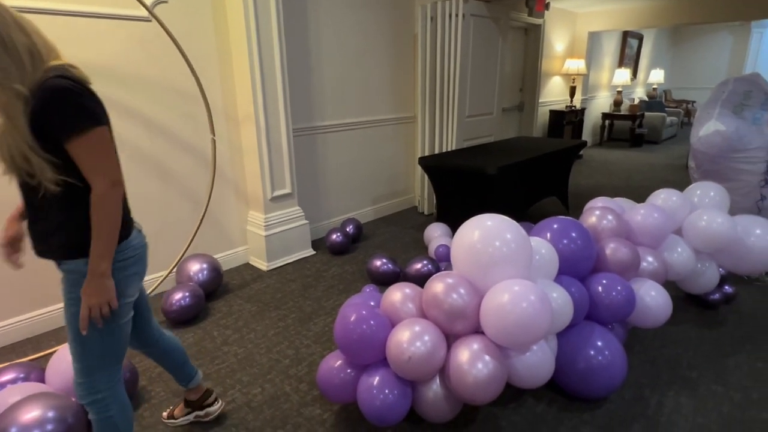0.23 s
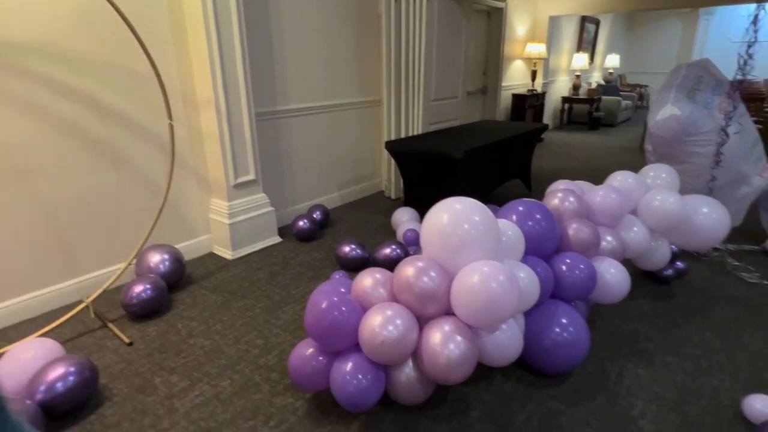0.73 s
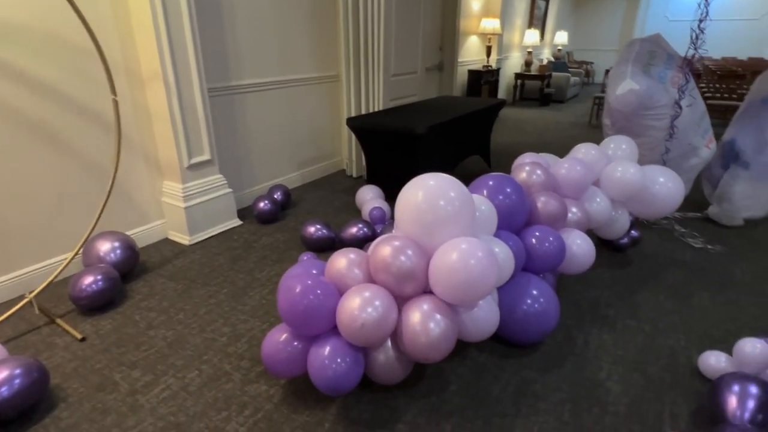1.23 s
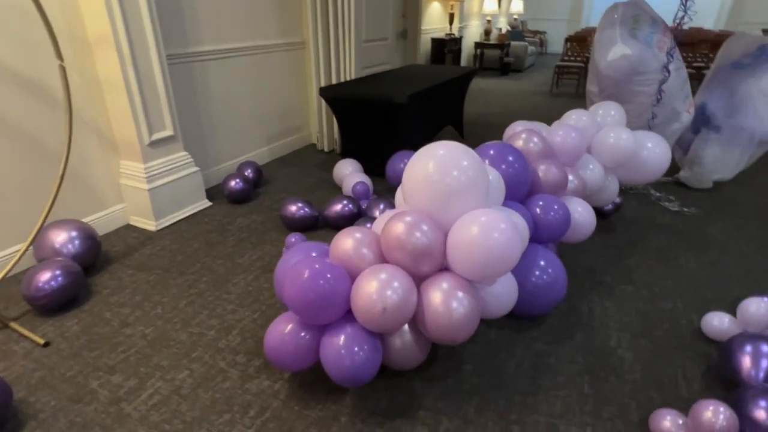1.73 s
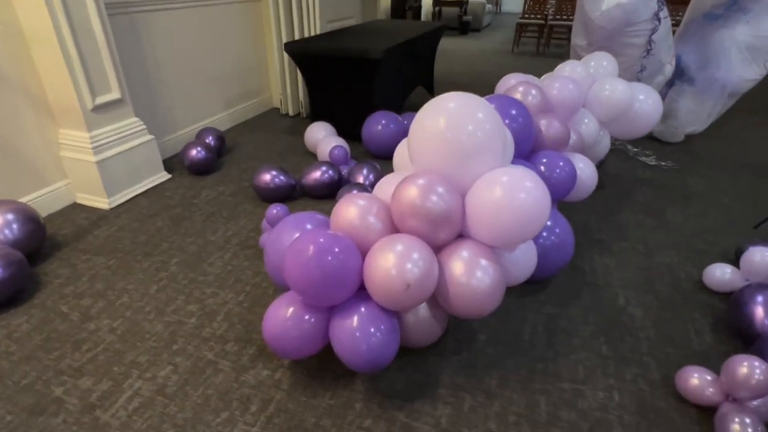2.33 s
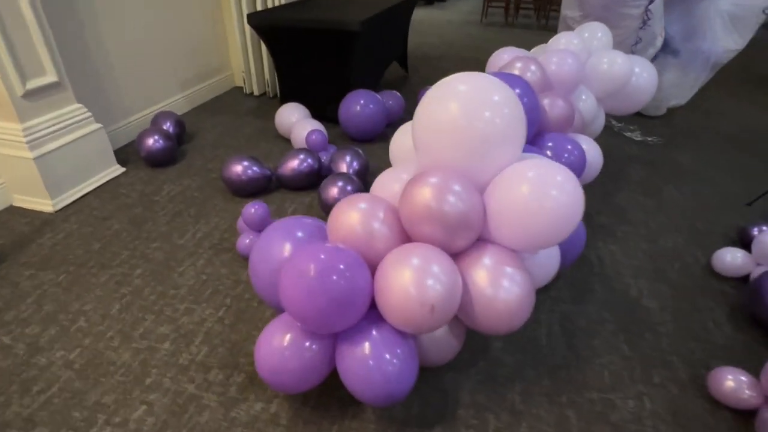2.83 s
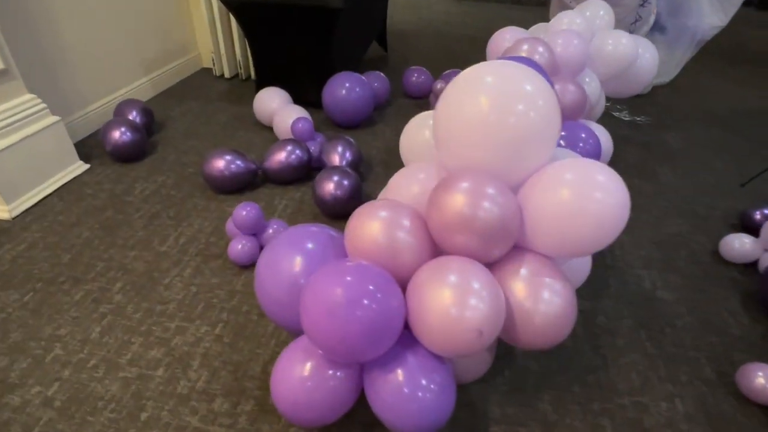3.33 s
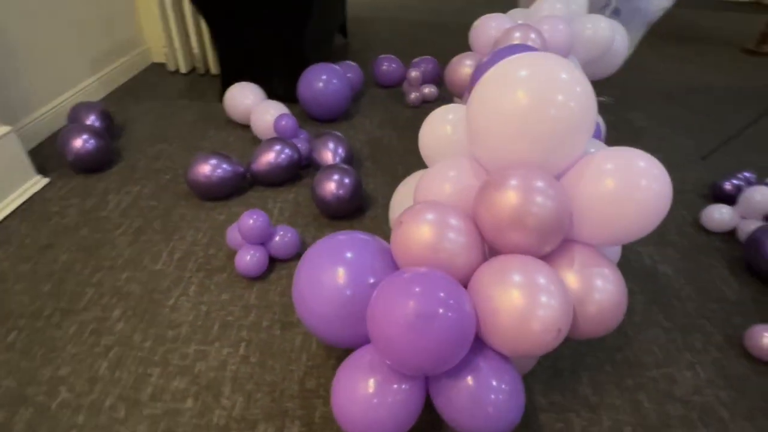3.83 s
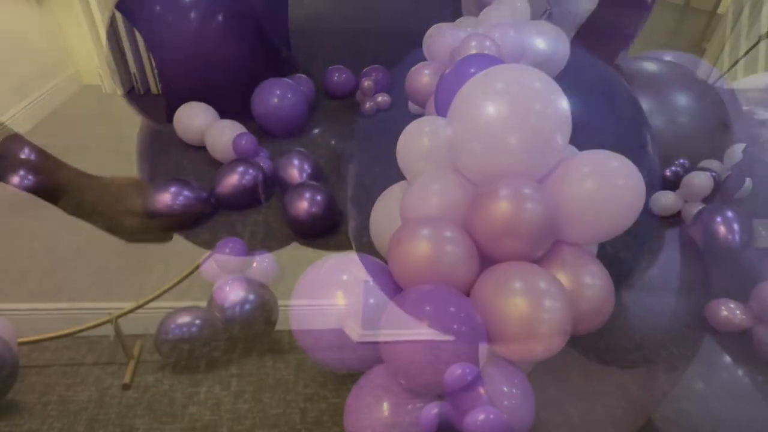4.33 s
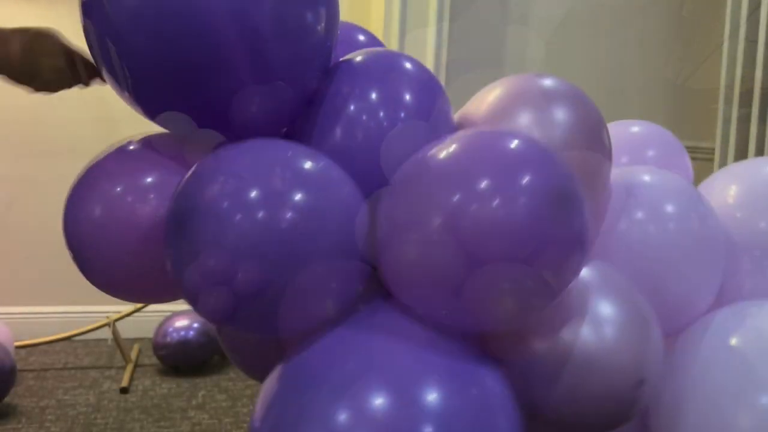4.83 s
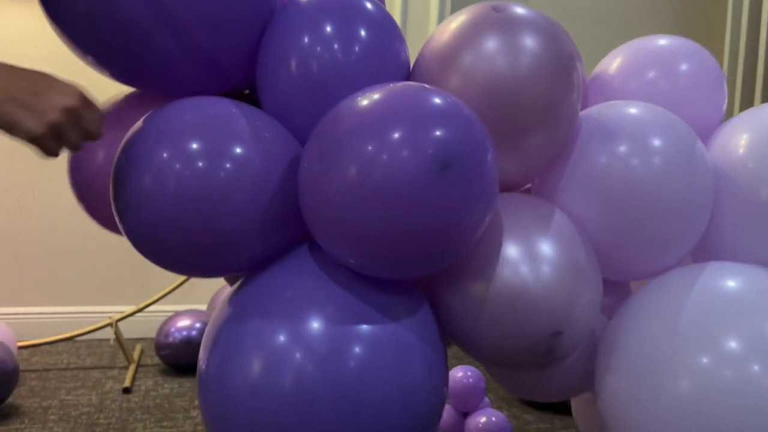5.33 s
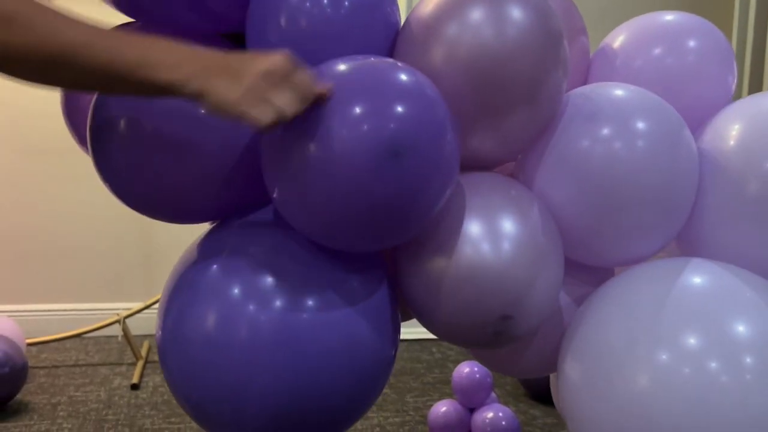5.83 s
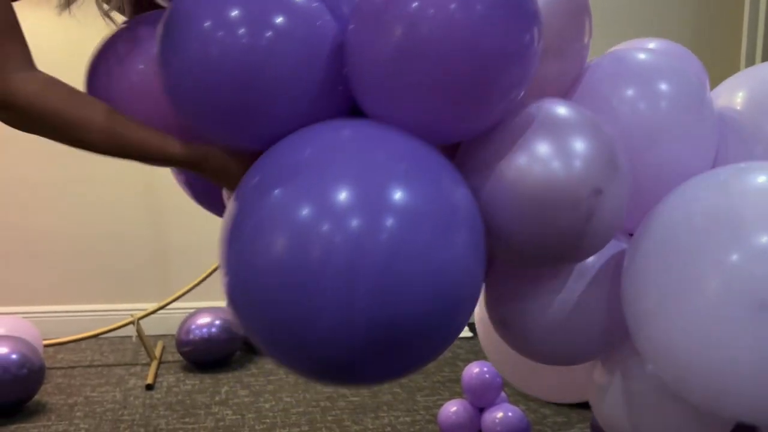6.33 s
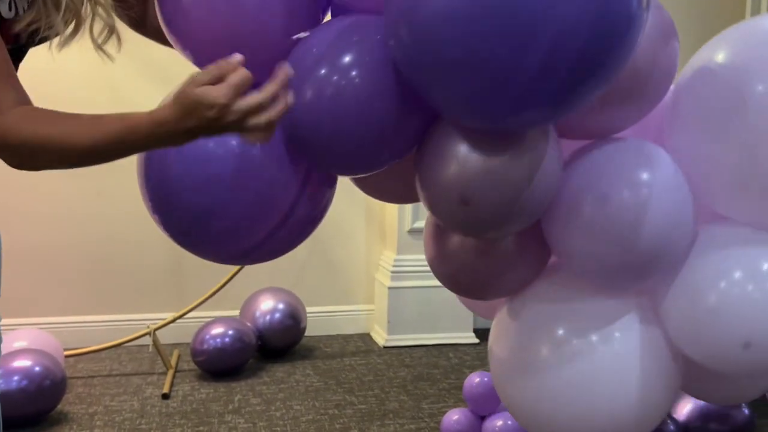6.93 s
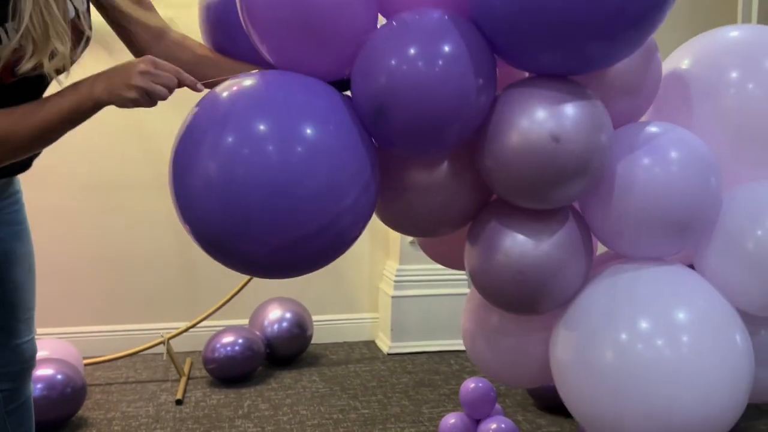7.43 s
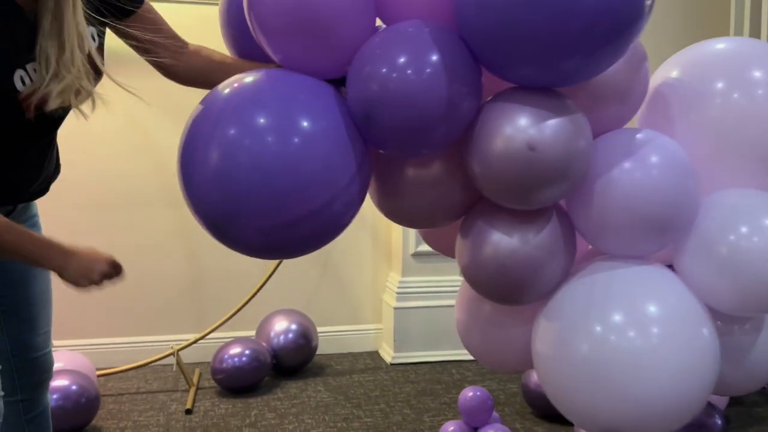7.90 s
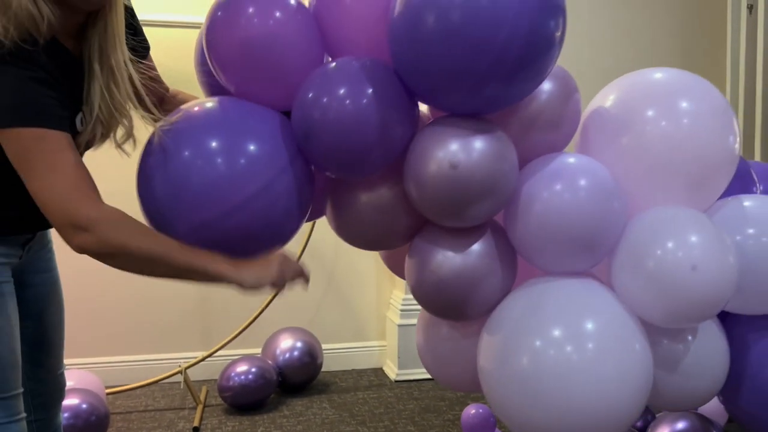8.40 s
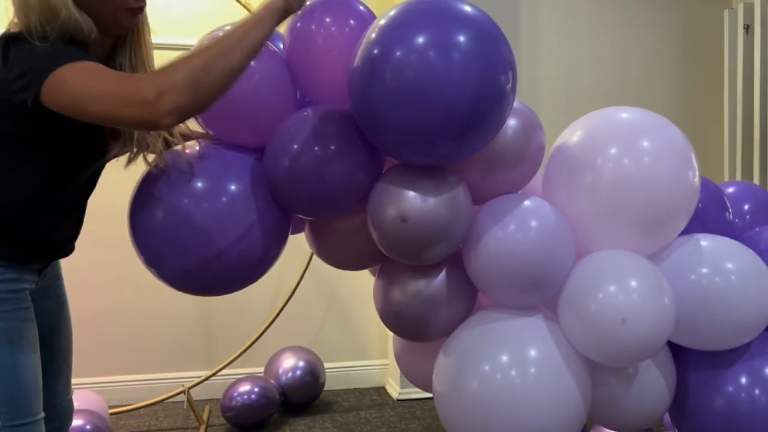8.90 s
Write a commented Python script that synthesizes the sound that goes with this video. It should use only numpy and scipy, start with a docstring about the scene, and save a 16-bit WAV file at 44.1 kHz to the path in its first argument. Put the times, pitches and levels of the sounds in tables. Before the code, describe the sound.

A carpeted indoor hall with a low, slowly throbbing ventilation hum. At first only faint shoe scuffs, cloth brushing and a few tiny clicks. After about four seconds latex balloons start rubbing close by, with gritty friction, hollow falling knocks, short squeaks and snappy cracks, strongest near five and seven and a half seconds, then softer creaks. Stereo microphone fairly near, brief room ring, work slightly left.

```python
"""Balloon garland in a humming hall

A garland of latex balloons is fitted together in a carpeted hall where the ventilation hums.
Mostly shoes and clothes brush along first, as shaped noise; then the balloons rub in streams of tiny slips.
Stuck skins let go with a noisy crack and a hollow, falling knock; swept tones squeak or groan,
and short noise bursts make clicks, taps and bright edges. Decaying noise makes the hall ring briefly.
"""
import sys
import numpy as np
from scipy import signal
from scipy.fft import rfft, irfft
from scipy.io import wavfile
from scipy.ndimage import map_coordinates

SR = 44100
rng = np.random.default_rng(int(sys.argv[2]) if len(sys.argv) > 2 else 0)


def unload_wav(signal):
    """Save mono or channel-first audio to the path in sys.argv[1] as 16-bit WAV at rate SR, clipped to [-1, 1]."""
    wavfile.write(
        sys.argv[1],
        SR,
        np.round(np.clip(np.atleast_2d(signal).T, -1, 1) * 32767).astype(np.int16),
    )


N = 403956
T = np.arange(N) / SR  # time of every sample [s]
SIDES = np.array([[1], [-1]])  # left, right

# Levels in the tables are those going into the mix; the layers are balanced further on.
# skins letting go: (time [s], knock [dB], knock pitch at its peak [Hz], heave [dB], rasp [dB],
# crack [dB], slip length [s])
SLIPS = [ (4.485, -40, 650, -53, -52, -65, 0.0021), (4.631, -32, 570, -51, -45.5, -71, 0.019),
         (4.683, -44, 700, -50, -45, -51.5, 0.023), (4.75, -13.5, 350, -29, -26, -24.5, 0.0095),
         (4.844, -30, 400, -46, -63, -38.5, 0.0063), (4.966, -31, 504, -45, -42, -61, 0.0029),
         (5.04, -35, 600, -52, -54, -66, .012), (5.211, -32, 620, -38, -38, -44, 0.0045),
         (5.2130, -16, 520, -19.5, -47, -54, .002), (5.357, -8.5, 456, -18.5, -19.5, -29.5, 0.0062),
         (5.373, -25, 500, -28, -32, -50, 0.0045), (5.57, -27.5, 470, -31, -40, -44, 0.005),
         (5.616, -24, 490, -32, -33, -34, 0.0072), (5.837, -22.5, 606, -31, -38, -42, 0.0041),
         (5.901, -27, 427, -36, -56, -49, 0.0046), (6.127, -41, 603, -48, -54, -70, 0.0017),
         (6.161, -36, 520, -43, -54, -66, 0.0025), (6.225, -28.5, 440, -35.5, -41, -44.5, 0.0098),
         (6.284, -29, 470, -34, -55, -60, 0.0028), (6.403, -37, 645, -46, -42, -53, .005),
         (6.687, -34, 570, -30, -56, -47, 0.0022), (6.806, -44, 710, -49, -45, -52, 0.0035),
         (6.924, -42, 500, -53, -53, -70, 0.0025), (6.948, -36, 554, -53, -49, -66, 0.0033),
         (7.055, -40, 605, -55, -44, -64, .003), (7.0963, -30, 457, -33.5, -37, -52, 0.0057),
         (7.171, -33, 380, -52, -45.5, -59, 0.022), (7.321, -52, 400, -60, -50, -35, 0.0015),
         (7.4490, -19, 340, -34, -33, -34, 0.011), (7.455, -23.5, 330, -31, -30, -32, 0.0077),
         (7.6117, -35, 300, -44, -30, -10.5, 0.0011), (7.6142, -16.5, 285, -23, -21, -21, 0.0045),
         (7.6683, -17.5, 640, -41, -35, -18, 0.0033), (7.673, -21, 470, -26, -24.5, -38, 0.0046),
         (7.85, -30, 580, -50.5, -31.5, -34.5, 0.0068), (8.11, -60, 395, -58, -43.5, -55.5, 0.0059),
         (8.277, -41, 372, -48, -35, -65, 0.0039), (8.3034, -26.5, 320, -31, -36, -45.5, 0.018),
         (8.578, -43, 380, -54, -62, -42, 0.0054), (8.642, -42, 346, -50, -42, -50.5, 0.011),
         (8.705, -52, 370, -62, -59, -40, 0.0091), (8.774, -41, 455, -46, -41.5, -58, 0.0082),
         (8.965, -40, 580, -55, -55, -56, 0.0028), ]
# faint slips lie deep in the garland and reach the ear mostly by way of the hall:
# room level of a typical slip, and room gained per dB that a slip is fainter
SLIP_ROOM_DB, ROOM_SLOPE, TYPICAL_SLIP_DB = 2, 0.29, -23.5
# a short slip stirs the hall less than a long drag: dB per doubling of the slip length
ROOM_DB_PER_DOUBLING, TYPICAL_SLIP_S = 2, 0.0047
# where the hands work: (time [s], left minus right [dB])
HAND_BALANCE = [(4.7, 3), (5.35, 5.5), (6.5, 1.5), (7.6, 1), (7.7, -1), (9, -1)]
# the air inside the balloons: (frequency [Hz], time to fall 60 dB [s], level [dB])
CAVITY_MODES = [(242, 0.52, -27), (336, 0.038, 7.5), (411, 0.041, 8.5), (550, 0.58, -10), (620, 0.33, 1),
                (737, 0.02, 15), (840, .2, -46), (1060, 0.28, -6), (1480, 0.048, 0), (2380, 0.12, 9)]

# how hard the balloons are pressed and dragged on each other: (time [s], effort [dB])
EFFORT = [(3.7, -47), (4.15, -11.5), (4.3, -8.5), (4.52, -0.5), (4.66, 6), (4.73, 0), (4.8, -1),
          (5.15, 0.5), (5.45, 3.5), (5.7, 0.5), (5.8, 5.5), (6.02, -4), (6.27, 2.5), (6.5, 1.5),
          (6.62, 3.5), (7.0, -5.5), (7.3, 1.5), (7.6, 11), (7.92, -4.5), (8.3, 2), (8.72, 3.5), (9.0, -8)]
# each layer of the rubbing: level at an effort of 0 dB, and dB gained per dB of effort
# (hard rubbing is brighter)
BODY_DB, BODY_SLOPE = -41.5, 0.69
RASP_DB, RASP_SLOPE = -48, 1.26
HISS_DB, HISS_SLOPE = -59, 1.18
# drumming of the balloons: (frequency [Hz], level per hertz [dB])
BODY_SPECTRUM = [(60, -19.5), (130, -19), (220, 1), (330, -2), (550, -4), (800, -6.5), (1300, -14.5),
                 (3000, -61)]
# rasp of the skins: (frequency [Hz], level per hertz [dB])
RASP_SPECTRUM = [(300, -19), (700, 1), (1000, 2.5), (1500, -2), (2300, -4.5), (3500, -12), (6000, -17.5),
                 (12000, -82)]
# hiss of fine slips, also the crack: (frequency [Hz], level per hertz [dB])
HISS_SPECTRUM = [(1200, -5.5), (3000, 0.5), (5000, -0.5), (6800, 4), (8600, 4.5), (10500, -8.5),
                 (12500, 2.5), (16000, -12)]

# single catches that stand out of the rubbing; the level is for the lowest pitch at an effort of 0 dB
CATCHES_PER_S, CATCH_DB, CATCH_LOW_HZ, CATCH_HIGH_HZ = 40, -38, 450, 2800

# skins chattering: (time [s], length [s], start pitch [Hz], end pitch [Hz], level [dB],
# pitch roughness [0-1])
SQUEAKS = [ (0.245, 0.11, 1300, 1536, -60, .1), (.938, .045, 1130, 1220, -55, .1),
           (1.014, .055, 1230, 1260, -58, .05), (4.618, 0.1, 564.4, 614, -41, 0.17),
           (4.622, 0.06, 1020, 1140, -44, 0.12), (4.63, .05, 2480, 2440, -51, .025),
           (4.685, 0.037, 1380, 1460, -46, 0.01), (4.686, .055, 2200, 2050, -49, .06),
           (5.387, 0.049, 915, 900, -36.5, 0.03), (7.404, 0.029, 327, 315, -31, 0.07),
           (7.468, 0.07, 1090, 1110, -44, 0.03), (7.545, 0.075, 1040, 1000, -40.5, 0.025),
           (7.694, 0.035, 350, 292, -27.5, 0.07), (7.851, .035, 1060, 1020, -37.5, .03),
           (7.864, 0.015, 332, 306, -27, 0.06), (8.106, .06, 2400, 2260, -51, .024),
           (8.106, .09, 2700, 2860, -52, .03), (8.107, .06, 3380, 3260, -53, .028),
           (8.122, .05, 1115, 1150, -56, 0), (8.316, 0.06, 325, 280, -30.5, 0.16),
           (8.415, 0.105, 335, 265, -29.5, 0.2), (8.635, 0.07, 330, 245, -34, 0.22),
           (8.76, 0.057, 1300, 1590, -45, 0.4), ]

# dry, very bright noise bursts, several together with a slip: (time [s], level [dB], length [s])
BRIGHT_BURSTS = [(4.846, -25.5, 0.0069), (6.234, -34.5, 0.0064), (7.004, -40, .0015), (7.319, -44, .001),
                 (7.611, -21, .0008), (7.6695, -19, 0.0024)]
# a bright burst: (frequency [Hz], level per hertz [dB])
BURST_SPECTRUM = [(2000, -30), (5000, -6), (8000, 3), (12000, 2), (16000, 3)]

# brief clicks and taps, some of them at the sharp edge of a slip:
# (time [s], bright tick [dB], thin click [dB], dull tap [dB], ring pitch [Hz], ring [dB])
TICKS = [ (.1950, -39, -43, -43, 1400, -44), (0.2153, -45, -63, -57, 1400, -48),
         (.2380, -36, -40, -46, 1050, -43), (.2875, -25, -42, -37, 1780, -31.5),
         (.333, -65, -60, -57, 1550, -46), (0.9305, -52, -39, -42, 2200, -50),
         (1.396, -70, -41, -56, 1500, -44), (1.458, -62, -52, -45, 1000, -50),
         (1.712, -80, -60, -46, 800, -38), (1.962, -73, -60, -54, 1050, -38),
         (3.63, -80, -60, -54, 1690, -41), (4.215, -80, -66, -50, 690, -39),
         (4.405, -62, -44, -44, 1500, -60), (5.2105, -60, -36, -50, 1500, -60),
         (5.8375, -60, -28, -34, 1300, -34), (7.098, -60, -35, -42, 1500, -60),
         (7.3212, -50, -33, -38, 1100, -36), (7.6120, -24, -11, -24, 1400, -24), ]
# a bright tick: (frequency [Hz], level per hertz [dB])
TICK_SPECTRUM = [(1000, -40), (6500, -47), (8500, 8), (9600, 9), (11000, 2), (13000, -31), (16000, -59)]
# a thin click: (frequency [Hz], level per hertz [dB])
CLICK_SPECTRUM = [(500, -22), (1400, 0), (3000, -1), (5800, -1), (8000, -12), (14000, -40)]
# a dull tap: (frequency [Hz], level per hertz [dB])
TAP_SPECTRUM = [(300, -2), (700, 15), (1350, 0), (1850, -12), (2400, -16), (5000, -43), (8000, -16),
                (14000, -40)]

# footfalls, each a touch and a drag over the pile: (time [s], fade time [s], touch [dB], scuff [dB], swish [dB])
STEPS = [ (.172, 0.18, -59, -50.5, -62), (0.462, 0.037, -66, -55, -56), (.890, 0.065, -68, -51, -63),
         (.930, 0.1, -62, -61, -89), (1.456, 0.067, -53, -50, -67), (1.592, 0.022, -43, -65, -64),
         (1.713, 0.033, -53, -60, -72), (1.96, 0.11, -58, -50.5, -83), (2.405, 0.51, -46, -56.5, -60),
         (2.671, 0.059, -65, -69, -90), (3.632, 0.01, -69, -78, -86), (4.215, 0.013, -63, -70, -82),
         (4.256, 0.04, -54, -50, -85), ]
# cloth sliding on cloth, each a swell and a fade:
# (peak time [s], rise time [s], fade time [s], scuff [dB], swish [dB])
BRUSHES = [ (.3, .07, 0.056, -75, -83), (.96, 0.17, 0.17, -57, -65.5), (1.58, 0.21, 0.22, -57.5, -68.5),
           (2.09, 0.17, 0.17, -56.5, -63), (2.68, 0.24, 0.78, -62, -60.5), (2.76, 0.13, 0.05, -52.5, -70),
           (2.91, 0.13, 0.2, -52.5, -57.5), (3.68, 0.28, 0.27, -55.5, -79), ]
# dull scuffing: (frequency [Hz], level per hertz [dB])
SCUFF_SPECTRUM = [(150, -19.5), (300, 7.5), (600, -2.5), (1100, -3), (2200, -11.5), (4000, -17),
                  (8000, -29.5), (13000, -56)]
# bright swishing: (frequency [Hz], level per hertz [dB])
SWISH_SPECTRUM = [(1500, -20), (4000, -2.5), (7500, 5.5), (9500, 2), (12000, -8), (16000, -18)]

# the tail of the hall: (frequency [Hz], time to fall 60 dB [s])
HALL_DECAY = [(100, 0.6), (400, 0.88), (2000, 0.61), (6000, 0.63), (14000, 0.21)]
# likeness of left and right in sound from all sides: (frequency [Hz], likeness [0-1])
LIKENESS = [(50, 1), (250, 0.89), (500, 0.58), (1000, 0.1), (3000, 0.019), (8000, 0.044)]
LEFT_DB, RIGHT_LAG_S = 1.57, 1 / SR  # the work lies a little to the left

# two fans: the second runs a little slower and sags further, so their beat quickens up to a limit
FAN_HZ, BEAT_START_HZ, SAG_HZ_PER_S, BEAT_END_HZ = 59.0, 2.24, 0.99, 4.7
BLADE_HZ = 191.3
# each hum tone along the way through the standing waves of the hall; first fan: (time [s], level [dB])
FAN_LEVEL = [(0, -40), (1.25, -37), (2, -43), (3, -58), (3.9, -55), (4.55, -43), (5.7, -51), (6.7, -38.5),
             (7.55, -35.5), (9.15, -44)]
# second, slower fan: (time [s], level [dB])
SLOW_FAN_LEVEL = [(0, -42), (1.3, -38.5), (3.5, -46), (4.2, -56), (5.5, -48), (9.15, -55)]
# overtone of the first fan: (time [s], level [dB])
OVERTONE_LEVEL = [(0, -48), (1.4, -51), (2.6, -48), (7.3, -45.5), (9.15, -46)]
# blade tone: (time [s], level [dB])
BLADE_LEVEL = [(0, -47.5), (1.4, -46), (1.8, -40.5), (2.8, -42), (3.4, -45), (4.2, -45.5), (4.55, -60),
               (5.2, -49), (9.15, -48)]
# air in the ducts: (frequency [Hz], level per hertz [dB])
AIR_SPECTRUM = [(20, -22), (35, -17), (48, 4), (90, 0.5), (150, -5.5), (230, -10), (400, -22.5),
                (700, -27.5), (1200, -32.5), (2500, -44.5), (5000, -50), (9000, -52.5), (13000, -72)]
AIR_DB = -41

TOP_HZ = 16000  # upper edge of the whole sound


def undb(db):
    """Decibels to gain."""
    return 10 ** (np.asarray(db) / 20)


def unit(x):
    """Scale to rms 1."""
    return x / np.sqrt(np.mean(x ** 2))


def gains(curve):
    """A (time [s], level [dB]) curve as a gain per sample."""
    return undb(np.interp(T, *np.transpose(curve)))


def at_hz(points, hz):
    """Read (frequency [Hz], value) points on a log-frequency axis."""
    f, value = np.transpose(points)
    return np.interp(np.log(np.maximum(hz, 1)), np.log(f), value)


def colour(x, points, size=2048):
    """Causal minimum-phase filter with the given spectrum; white noise keeps its power."""
    hz = np.linspace(0, SR / 2, size // 2 + 1)
    gain = unit(undb(at_hz(points, hz)))
    cepstrum = irfft(np.log(gain))[:size // 2]
    cepstrum[1:] *= 2
    response = irfft(np.exp(rfft(cepstrum, size)))
    return signal.oaconvolve(x, response)[:len(x)]


def wander(rate, size=N):
    """Smooth chance of spread about 1 that changes about rate times a second."""
    knots = rng.standard_normal(int(size / SR * rate) + 4)
    return map_coordinates(knots, [np.arange(size) / SR * rate + 1], order=2, mode="nearest")


def grains(rate, scatter_db):
    """Tiny slips at random moments, rate per second and of uneven size, rms 1."""
    happens = rng.random(N) < rate / SR
    sign = rng.choice([-1, 1], N)
    size = undb(scatter_db * np.clip(rng.standard_normal(N), -2, 2))
    return unit(happens * sign * size)


def add(track, s, x):
    """Mix x into the track at time s."""
    i = int(s * SR)
    track[..., i:i + x.shape[-1]] += x[..., :N - i]


def slips(swell_s=0.0014, sag=0.81, heave_hz=160, heave_s=0.0083, knock_room_db=-5, ring_db=-21, size=24576):
    """A stuck patch tears loose with a crack; the balloon swings a few times and gives a hollow knock."""
    out, t = np.zeros((2, N)), T[:size]
    swing = (t / (2 * swell_s)) ** 2 * np.exp(2 - t / swell_s)
    # short ripples cross the skin first, so the pitch of a knock falls
    travel = np.cumsum(1 + sag * (np.exp(1 - t / (2 * swell_s)) - 1) / 2) / SR
    for s, knock_db, knock_hz, heave_db, rasp_db, crack_db, length in SLIPS:
        room_db = SLIP_ROOM_DB + ROOM_SLOPE * (TYPICAL_SLIP_DB - max(knock_db, crack_db))
        room_db += ROOM_DB_PER_DOUBLING * np.log2(length / TYPICAL_SLIP_S)
        stretch = 1 + 0.1 * rng.standard_normal()  # each balloon has its own size
        pan = undb(np.interp(s, *np.transpose(HAND_BALANCE)) * SIDES / 2)
        knock = undb(knock_db) * swing * np.sin(2 * np.pi * knock_hz * travel)
        # the whole balloon heaves more slowly against its neighbours
        heave = undb(heave_db) * np.sin(2 * np.pi * stretch * heave_hz * t) * np.exp(-t / heave_s)
        tear = rng.standard_normal((2, size)) * np.exp(-(t / length) ** 2)
        rasp = undb(rasp_db - 2.5) * colour(tear[0], RASP_SPECTRUM)
        crack = undb(crack_db - 0.5) * colour(tear[1], HISS_SPECTRUM)
        # the hall is fed one smooth-spectrum impulse as strong as the crack, giving an even tail
        impulse = signal.unit_impulse(size, int(length * SR / 2))
        smooth_crack = np.linalg.norm(crack) * colour(impulse, HISS_SPECTRUM)
        ring = undb(ring_db) * cavity(knock + rasp, stretch)
        echo = hall(undb(knock_room_db) * knock + heave + rasp + smooth_crack + ring)
        add(out, s, knock + heave + pan * (rasp + crack) + undb(room_db) * echo)
    return out


def rubbing():
    """Latex drags on latex in fits: coarse slips drum on the balloons, fine ones rasp and hiss."""
    effort = gains(EFFORT)
    fits = undb(2 * wander(40))
    coarse = grains(380, 5.4)
    mixed = 0.36 * coarse + 0.78 * grains(1300, 2.9)
    fine = grains(4000, 5.1)
    x = undb(BODY_DB) * effort ** BODY_SLOPE * colour(coarse, BODY_SPECTRUM)
    x += undb(RASP_DB) * effort ** RASP_SLOPE * colour(mixed, RASP_SPECTRUM)
    x += undb(HISS_DB) * effort ** HISS_SLOPE * colour(fine, HISS_SPECTRUM)
    # the contact passes back and forth between a large and a small balloon
    turn = wander(2.8)
    ring = cavity(x * np.cos(turn), 0.93) + cavity(x * np.sin(turn), 1.082)
    return fits * (x + undb(-19.0) * ring)


def cavity(x, stretch, size=12288):
    """The air in a balloon rings, higher in a smaller one; a mode at 0 dB passes its own pitch unchanged."""
    t, ring = T[:size], 0
    for hz, t60, db in CAVITY_MODES:
        decay = np.log(1000) / t60  # [1/s]
        mode = np.exp(-decay * t) * np.sin(2 * np.pi * stretch * hz * t)
        ring = ring + undb(db) * 2 * decay / SR * mode
    return signal.oaconvolve(x, ring)[:len(x)]


def catches(ring_cycles=1.6, scatter_db=3, size=1024):
    """Small patches catch and spring free; each pings at its own pitch, the small high ones more faintly."""
    x, t, effort = np.zeros(N), T[:size], gains(EFFORT)
    for when, patch, force in rng.random((int(CATCHES_PER_S * N / SR), 3)):
        hz = CATCH_LOW_HZ * (CATCH_HIGH_HZ / CATCH_LOW_HZ) ** patch
        strength = undb(CATCH_DB + scatter_db * (2 * force - 1)) * effort[int(when * N)]
        strength *= np.sqrt(CATCH_LOW_HZ / hz)
        ping = np.sin(2 * np.pi * hz * t) * np.exp(-t * hz / ring_cycles)
        add(x, when * N / SR, strength * ping)
    return x + undb(-4) * hall(x)


def squeaks(overtone_db=-12, pure_hz=2200, grip_s=0.0018):
    """The skin sticks and slips at a wavering, nearly pure pitch: high for a squeak, low for a groan."""
    x = np.zeros(N)
    for s, length, start_hz, end_hz, db, rough in SQUEAKS:
        n = int(length * SR)
        hz = np.linspace(start_hz, end_hz, n) * (1 + rough * wander(401, size=n))
        phase = 2 * np.pi * np.cumsum(hz) / SR
        # overtones are very faint, and fainter still for a high squeak
        step_db = overtone_db * (5.0 + start_hz / pure_hz)
        wave = sum(undb(step_db * k) * np.sin((k + 1) * phase) for k in range(4))
        pressure = (1 - np.exp(-T[:n] / grip_s)) * np.sqrt(np.linspace(1, 0, n))
        flutter = undb(2.4 * wander(225, size=n))
        add(x, s, undb(db) * unit(wave * pressure * flutter))
    return undb(-3) * x + undb(-7.5) * hall(x)


def bright_bursts(room_db=-14, size=2048):
    """Dry, very bright noise bursts that die within milliseconds, several of them together with a slip."""
    x, t = np.zeros(N), T[:size]
    for s, db, length in BRIGHT_BURSTS:
        burst = rng.standard_normal(size) * np.exp(-(t / length) ** 2)
        add(x, s, undb(db) * colour(burst, BURST_SPECTRUM))
    return x + undb(room_db) * hall(x)


def ticks(ring_s=0.0011, size=2048):
    """Brief clicks and taps, some at the sharp edge of a slip: three noise colours and a moment of ring."""
    x, t = np.zeros(N), T[:size]
    for s, tick_db, click_db, tap_db, ring_hz, ring_db in TICKS:
        bursts = rng.standard_normal((3, size)) * np.exp(-t / .001)
        noise = undb(tick_db) * colour(bursts[0], TICK_SPECTRUM)
        noise += undb(click_db) * colour(bursts[1], CLICK_SPECTRUM)
        noise += undb(tap_db) * colour(bursts[2], TAP_SPECTRUM)
        ring = np.sin(2 * np.pi * ring_hz * t) * np.exp(-t / ring_s)
        add(x, s, noise + undb(ring_db) * ring)
    return x + undb(-28) * hall(x)


def walking(touch_s=0.002):
    """Soles touch and drag over carpet pile, and cloth slides on cloth, each as a crunch of tiny grains."""
    scuff, swish = np.zeros((2, N))
    for s, rise_s, fade_s, scuff_db, swish_db in BRUSHES:
        slide = np.exp(-np.where(T < s, ((T - s) / rise_s) ** 2, (T - s) / fade_s))
        scuff += undb(scuff_db) * slide
        swish += undb(swish_db) * slide
    t = T[:SR]
    for s, fade_s, touch_db, scuff_db, swish_db in STEPS:
        drag = np.exp(-t / fade_s)
        add(scuff, s, undb(scuff_db) * drag + undb(touch_db) * np.exp(-t / touch_s))
        add(swish, s, undb(swish_db) * drag)
    crunch = undb(2 * wander(90) + 1.2 * wander(22))
    dull = undb(-0.5) * scuff * colour(grains(3000, 3.8), SCUFF_SPECTRUM)
    bright = undb(-4.5) * swish * colour(grains(9000, 1.5), SWISH_SPECTRUM)
    return crunch * (dull + bright)


def diffuse(size):
    """Noise that arrives from all sides: alike left and right in the bass, less so higher up."""
    mid, side = rfft(rng.standard_normal((2, size)))
    alike = np.clip(at_hz(LIKENESS, np.linspace(0, SR / 2, len(mid))), 0, 1)
    mid = mid * np.sqrt((1 + alike) / 2)
    side = side * np.sqrt((1 - alike) / 2)
    return irfft([mid + side, mid - side], size)


def hall(x, early_s=0.022, early_db=8, size=24576):
    """Dense reflections from the garland and the near wall, then the tail of the hall; new on every call."""
    t, hz = T[:size], np.linspace(0, SR / 2, size // 2 + 1)
    noise, response = rfft(diffuse(size)), 0
    shape = (1 + undb(early_db) * np.exp(-t / early_s)) * np.clip(t / 0.0054, 0, 1)
    centres = np.array(HALL_DECAY)[:, 0]
    # overlapping bands, each with its own decay
    for (_, t60), share in zip(HALL_DECAY, np.eye(len(HALL_DECAY))):
        fade = shape * np.exp(-np.log(1000) * t / t60)
        band = at_hz(np.c_[centres, share], hz)
        response = response + irfft(noise * band) * fade / np.linalg.norm(fade)
    return signal.oaconvolve(x[None], response, axes=1)[:, :len(x)]


def roaming_hall(x, count=8):
    """The sound starts from ever different contact points, and each has its own reflections."""
    share = np.array([wander(45) for _ in range(count)])
    share /= np.linalg.norm(share, axis=0)
    return sum(hall(x * part) for part in share)


def ventilation(spread=0.065):
    """Two fans beat against each other; an overtone and a blade tone sound over the rush of the ducts."""

    def tone(hz, drift):
        """A standing wave in the hall, a little ahead in phase on the left."""
        phase = 2 * np.pi * np.cumsum(hz * np.ones(N)) / SR
        return np.sqrt(2) * np.sin(phase + drift * wander(2.92) + spread * SIDES)

    beat_hz = np.minimum(BEAT_START_HZ + SAG_HZ_PER_S * T, BEAT_END_HZ)
    hum = gains(FAN_LEVEL) * tone(FAN_HZ, 0.087)
    hum += undb(-0.7) * gains(SLOW_FAN_LEVEL) * tone(FAN_HZ - beat_hz, 0.059)
    hum += undb(1.23 + 2.0 * wander(6.7)) * gains(OVERTONE_LEVEL) * tone(2 * FAN_HZ, 0.51)
    hum += undb(-2.3 + 1 * wander(5.2)) * gains(BLADE_LEVEL) * tone(BLADE_HZ, 0.19)
    air = unit(np.array([colour(side, AIR_SPECTRUM) for side in diffuse(N)]))
    air = air * undb(AIR_DB + .5 * wander(3.3))
    return (hum + air) * undb(0.57 * SIDES)  # a little louder on the left


def scene():
    """The work goes on a little off centre: the left hears it louder and a trace earlier."""
    friction = walking() + rubbing()
    work = undb(-6.5) * friction + undb(-1.0) * roaming_hall(friction)
    work = work + slips() + catches() + squeaks() + bright_bursts() + ticks()
    left, right = work
    right = np.interp(T - RIGHT_LAG_S, T, right)
    return np.array([left * undb(LEFT_DB / 2), right * undb(-LEFT_DB / 2)]) + ventilation()


def record(dry):
    """A steep elliptic low-pass cuts the top."""
    return signal.sosfilt(signal.ellip(8, .2, 70, TOP_HZ, fs=SR, output="sos"), dry)


dry = scene()
out = record(dry)
unload_wav(out)
```